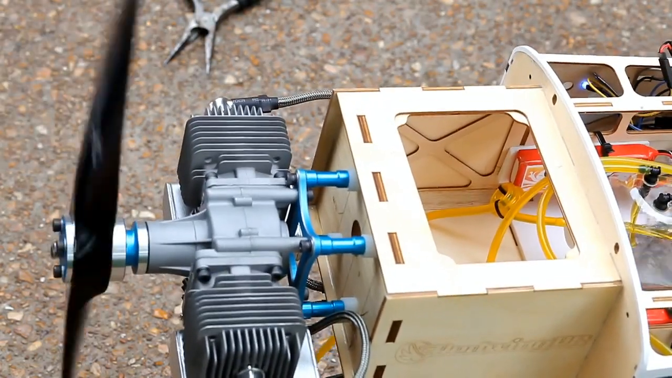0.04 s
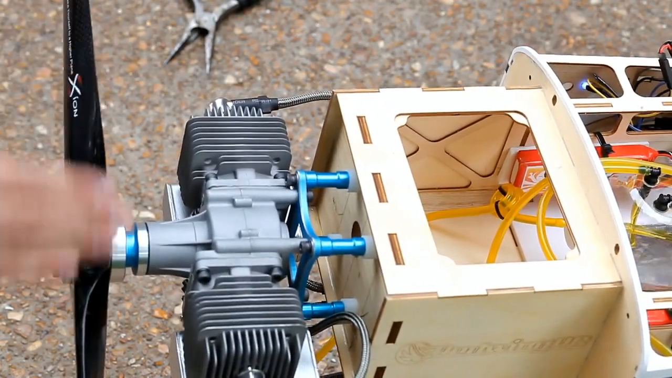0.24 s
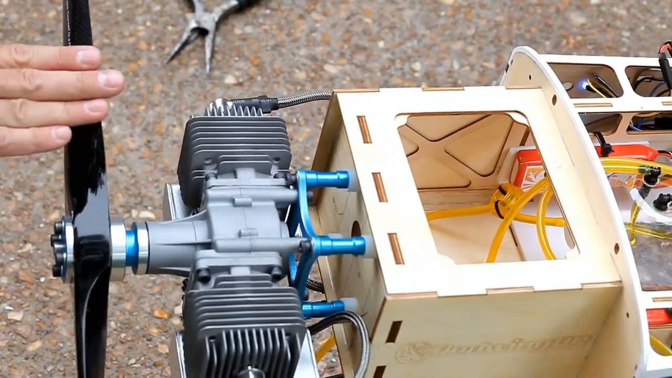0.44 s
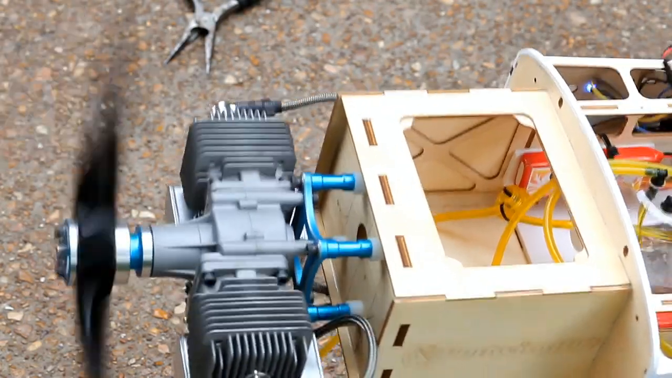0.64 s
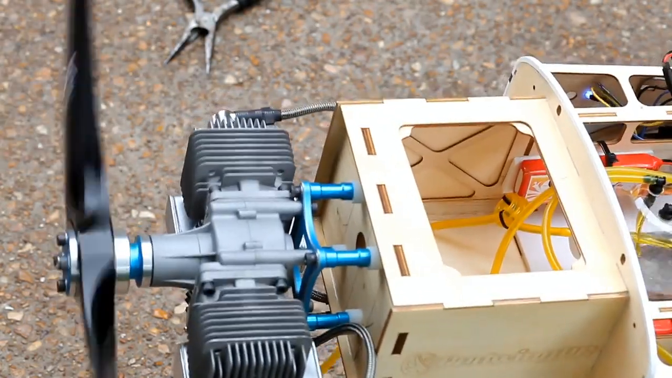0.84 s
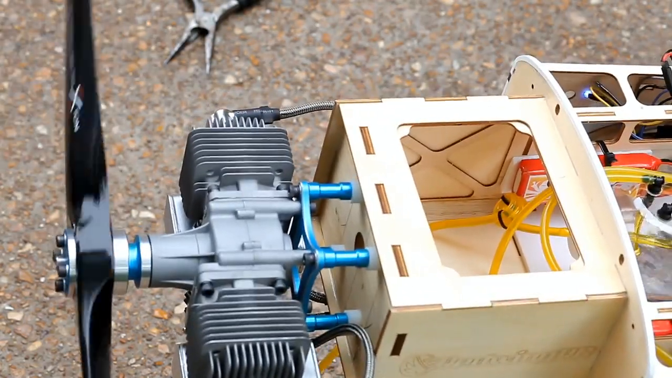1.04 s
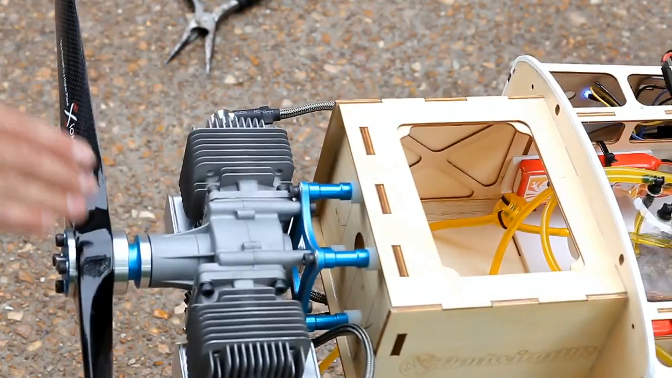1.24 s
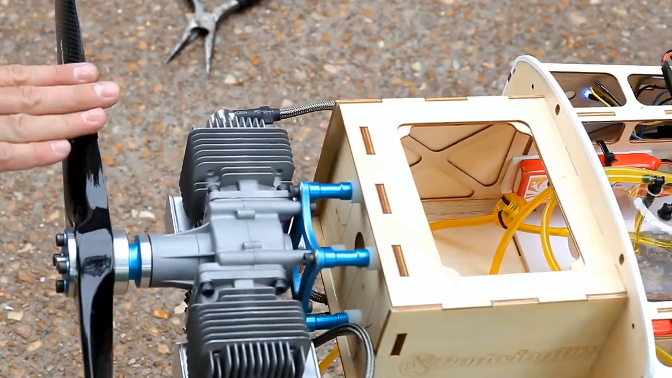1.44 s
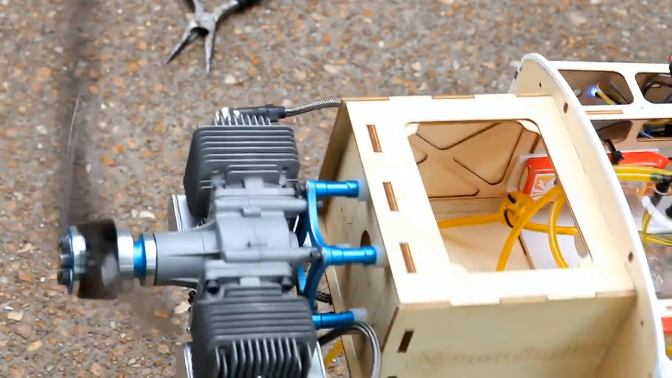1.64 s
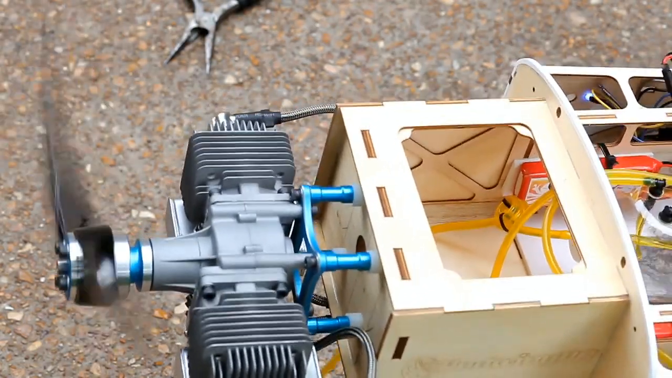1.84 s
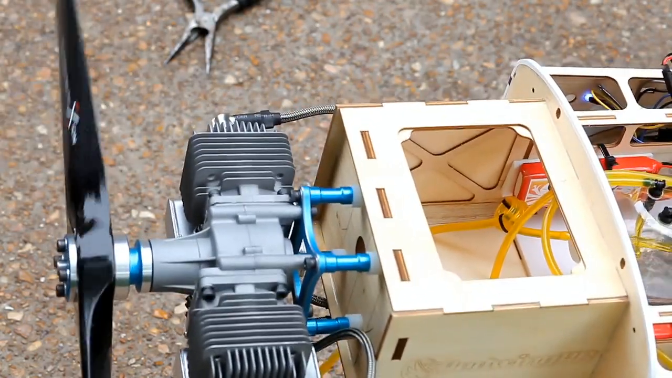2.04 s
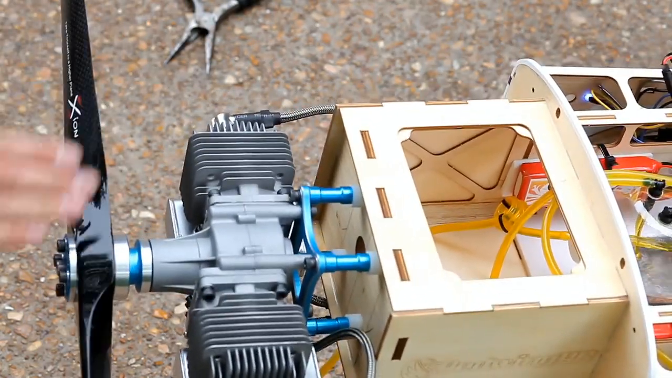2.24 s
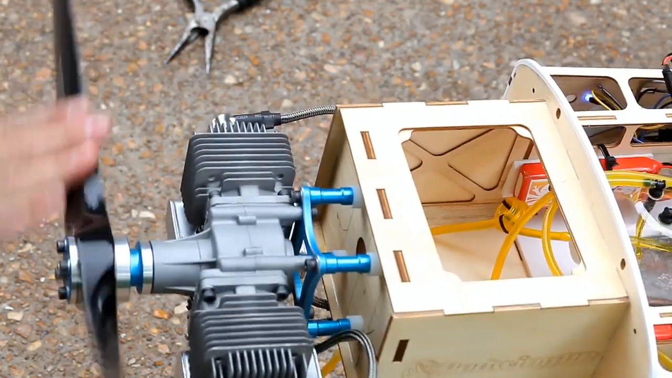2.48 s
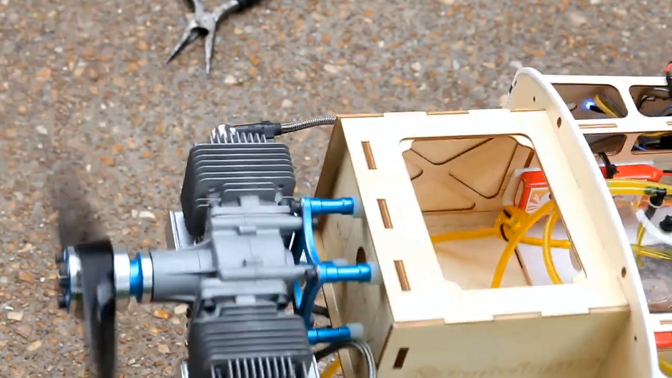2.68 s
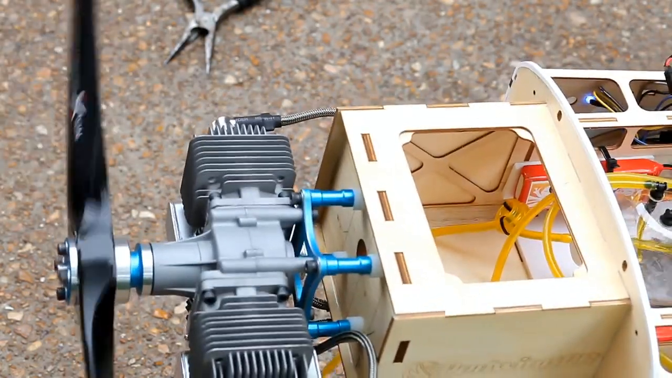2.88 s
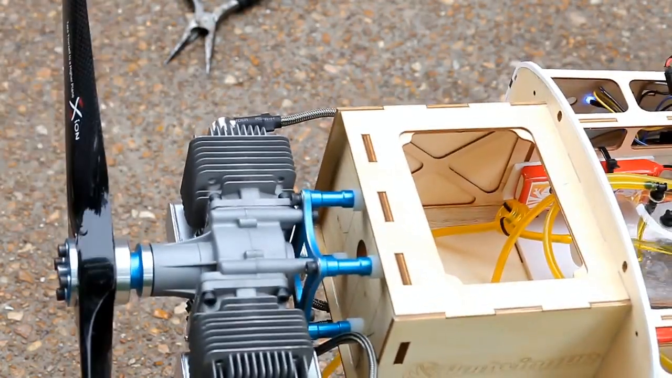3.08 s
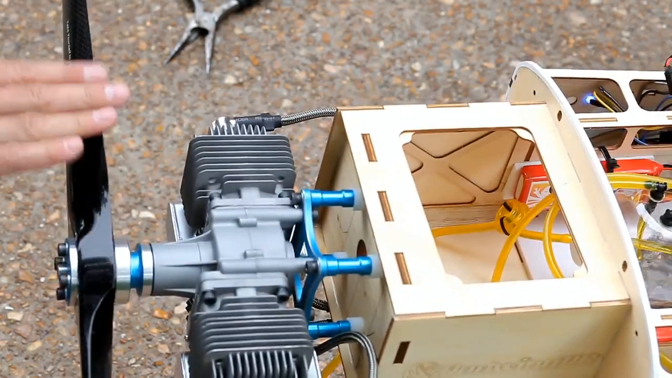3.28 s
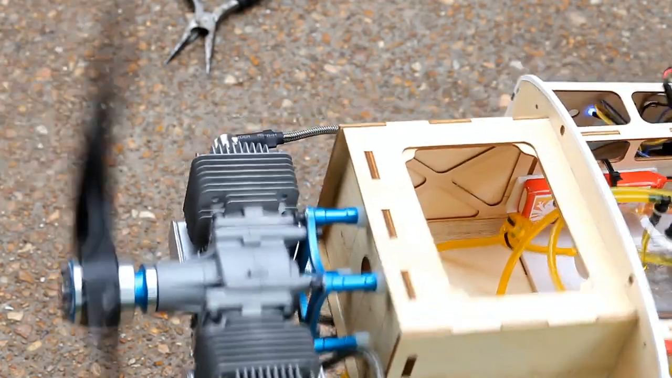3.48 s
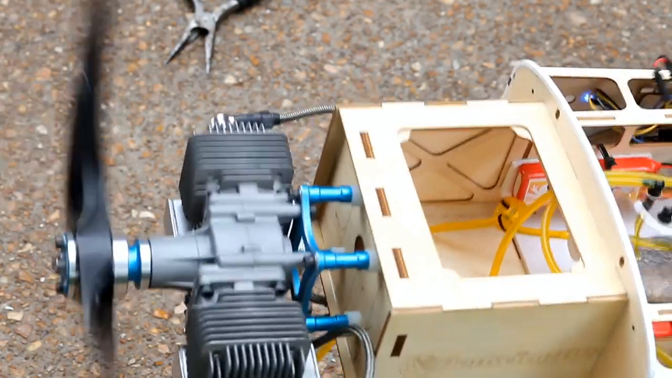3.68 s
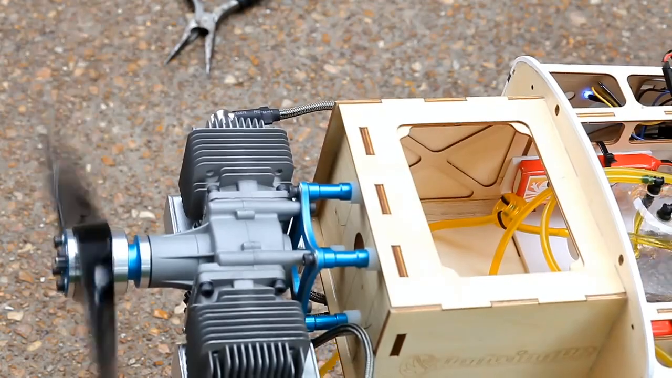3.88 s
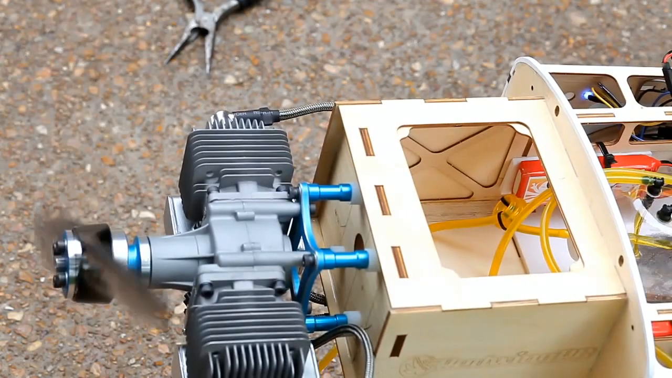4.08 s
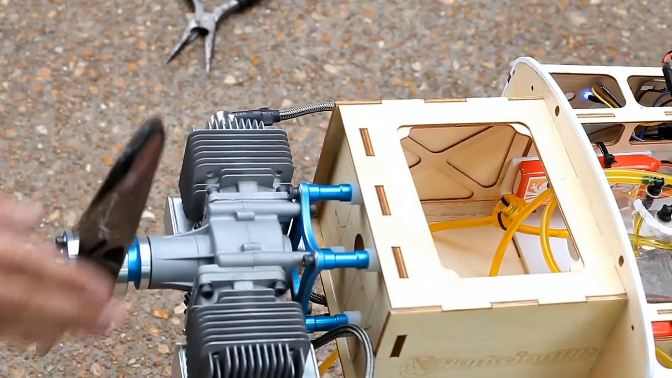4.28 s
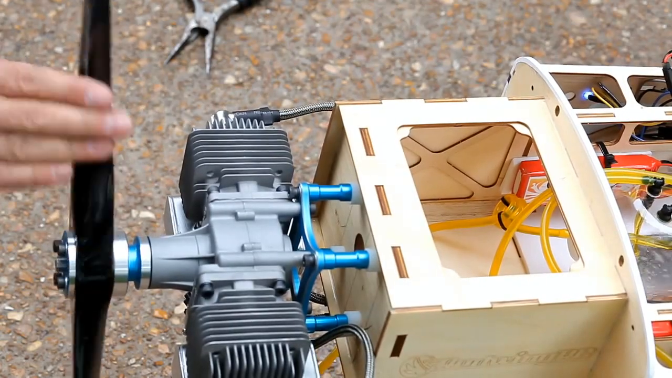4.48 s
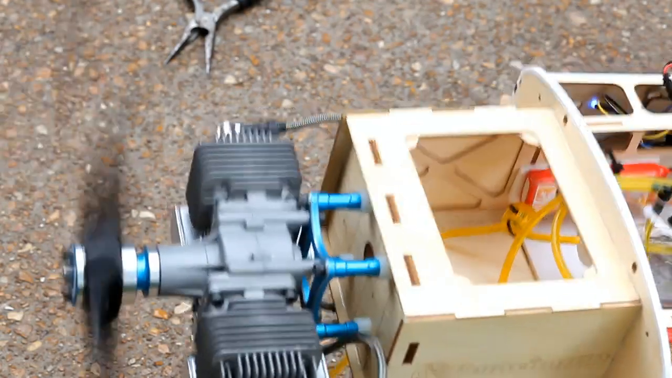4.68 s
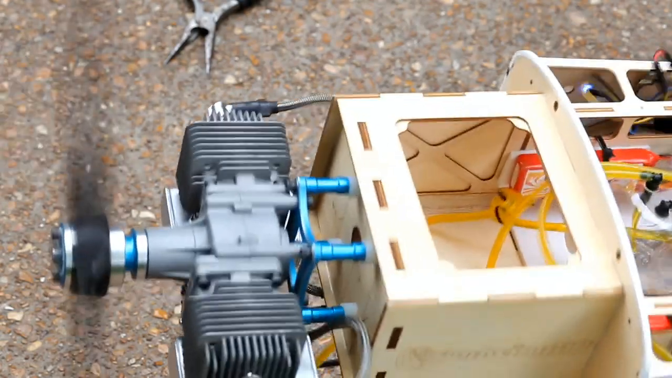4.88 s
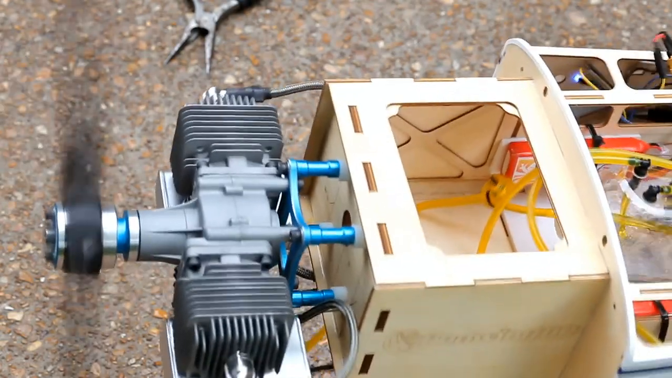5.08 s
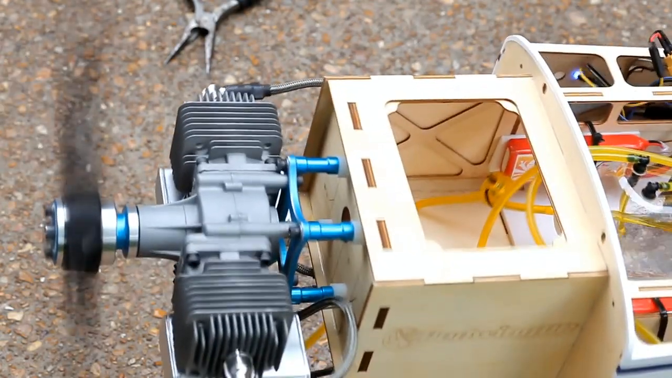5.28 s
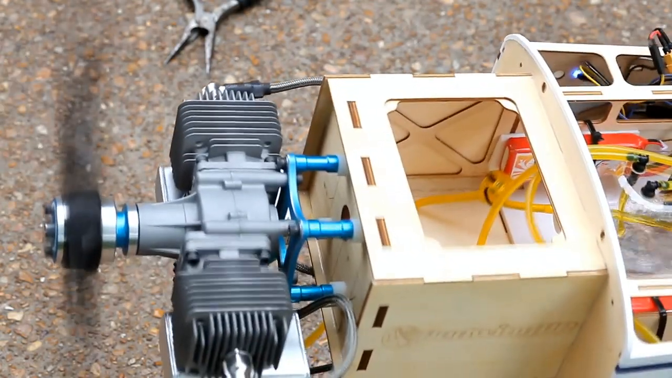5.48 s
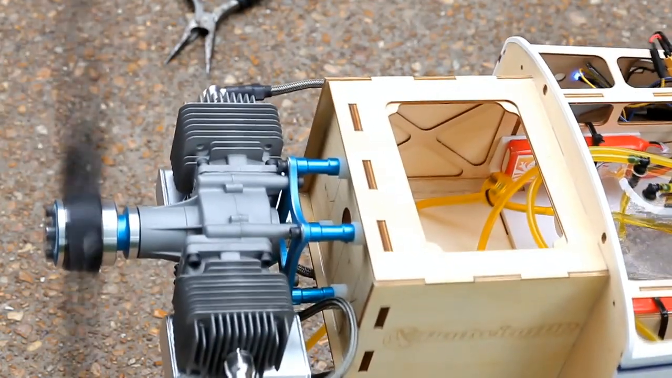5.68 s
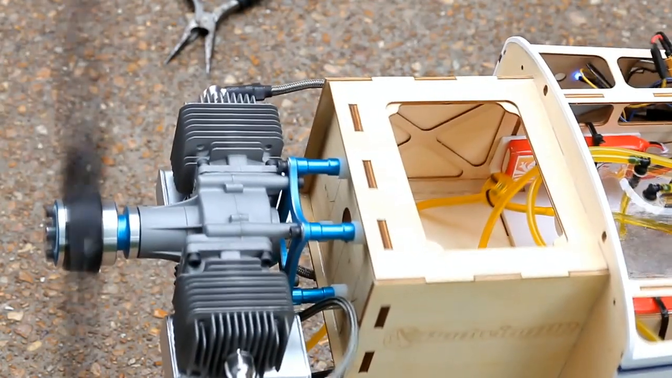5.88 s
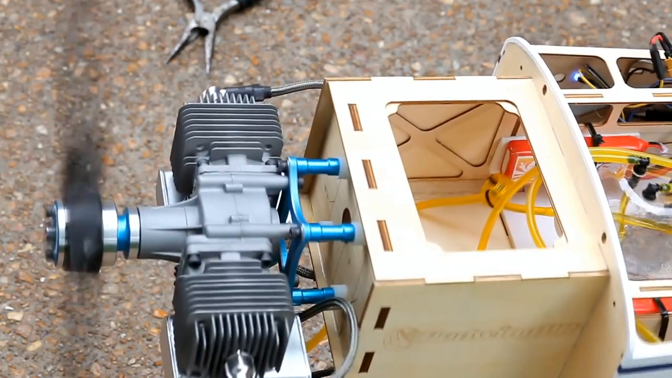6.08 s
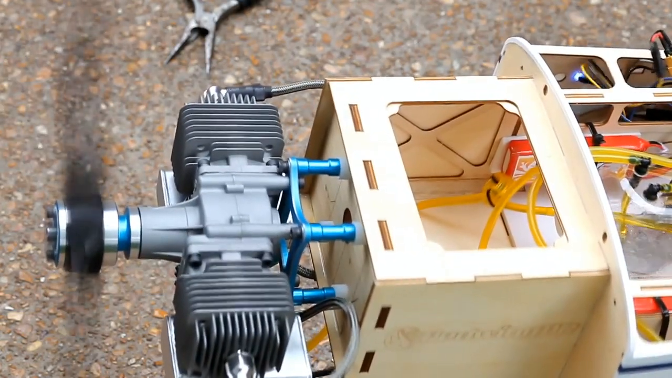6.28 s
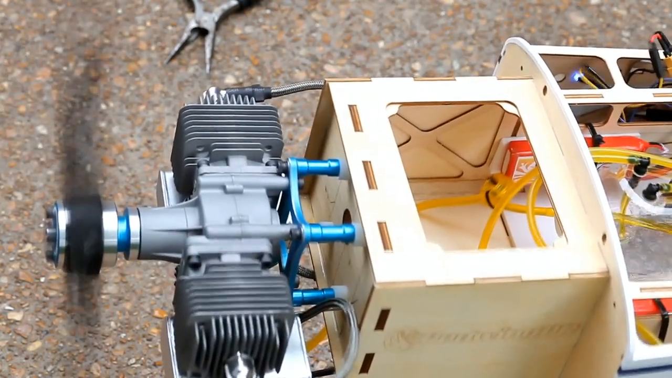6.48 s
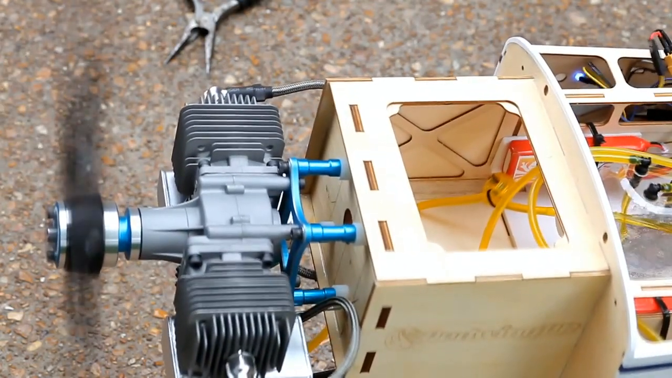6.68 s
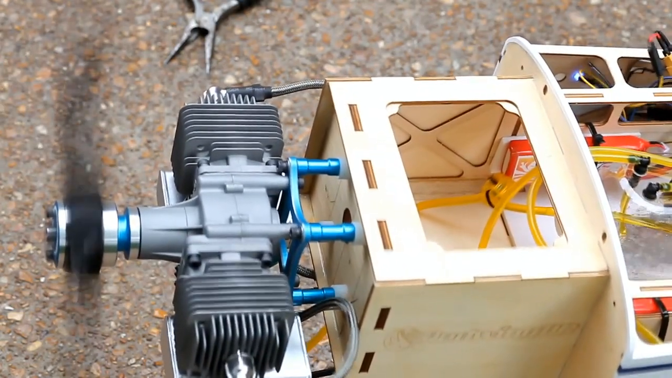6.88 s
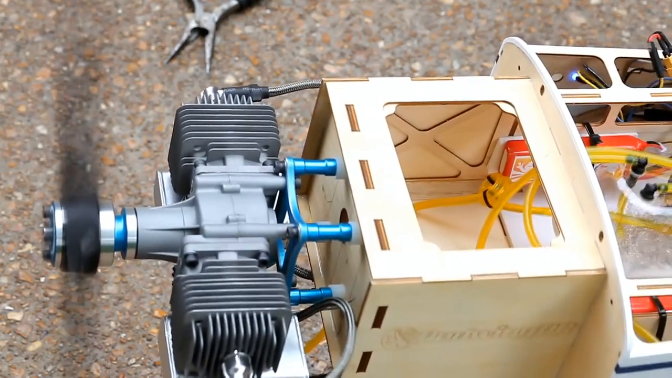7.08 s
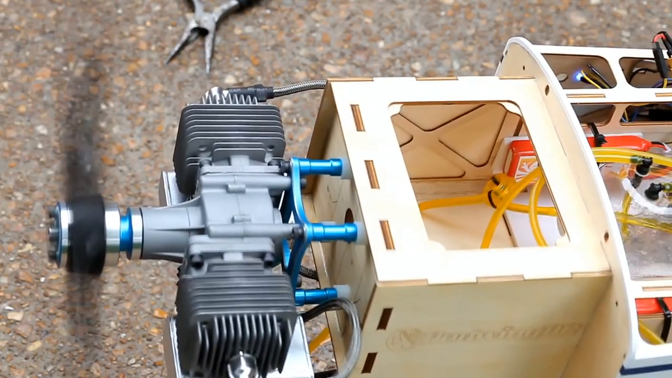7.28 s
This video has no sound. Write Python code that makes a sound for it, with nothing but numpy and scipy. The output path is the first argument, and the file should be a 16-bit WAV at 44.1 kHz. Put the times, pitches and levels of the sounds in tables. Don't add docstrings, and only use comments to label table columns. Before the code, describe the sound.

Close outdoor phone pickup of a small two-cylinder two-stroke model engine. Four hand flips of the propeller give hollow low pops with air gulps, reed clacks, hissing leaks and small knocks, with quiet gaps between. The fifth flip catches: loud, harsh, rapid exhaust cracks at an uneven idle, metallic rattle and throbbing propeller air. A short rev comes near the end, then it drops back. The loud part overloads the microphone.

```python
import sys
import numpy as np
from scipy import signal
from scipy.fft import rfft, irfft
from scipy.io import wavfile
from scipy.ndimage import uniform_filter1d

SR = 44100
rng = np.random.default_rng(int(sys.argv[2]) if len(sys.argv) > 2 else 0)


def volts_from_decibels(level):
    exponent = np.asarray(level, float) / 20
    return 10 ** exponent


def digitize_waveform(pressure):
    field = np.atleast_2d(pressure).T
    bounded = np.clip(field, -1, 1)
    quanta = np.round(bounded * 32767).astype(np.int16)
    wavfile.write(sys.argv[1], SR, quanta)


N = 323253
TIME = np.arange(N) / SR
SHORT = 8192


def level(x, db):
    return x * volts_from_decibels(db) / np.sqrt(np.mean(x ** 2))


def band(x, hz, width):
    return signal.lfilter(*signal.iirpeak(hz, hz / width, fs=SR), x)


def highpass(x, hz, order=3):
    return signal.sosfilt(signal.butter(order, hz, "high", fs=SR, output="sos"), x)


def resonate(x, peaks):
    total = 0
    for k, (hz, width, db) in enumerate(peaks):
        total = total + (-1) ** k * volts_from_decibels(db) * band(band(x, hz, width), hz, 2 * width)
    return total


def decay(t, t60):
    return 1000. ** (-t / t60)


def ring(modes, drop=0.):
    t = TIME[:SHORT]
    bent = t + drop * 0.0043 * (1 - np.exp(-t / 0.0021))
    return sum(volts_from_decibels(db) * np.sin(2 * np.pi * hz * bent) * decay(t, t60) for hz, db, t60 in modes)


def push(ms):
    shape = np.hanning(int(ms * SR / 1000) + 3)
    return shape / shape.sum()


def train(times, sizes, shape):
    clicks = np.zeros(N)
    np.add.at(clicks, np.minimum((times * SR).astype(int), N - 1), sizes)
    return signal.fftconvolve(clicks, shape)[:N]


def coloured(points):
    hz, db = np.transpose(points)
    gain = volts_from_decibels(np.interp(np.log(np.fft.rfftfreq(N, 1 / SR) + 1), np.log(hz), db))
    return level(irfft(rfft(rng.standard_normal(N)) * gain, N), 0)


def walk(rate):
    k = int(SR / rate)
    held = np.repeat(np.minimum(rng.standard_normal(N // k + 1), 1.3), k)
    return uniform_filter1d(held, k)[:N]


def grains(rate, spread_db):
    size = volts_from_decibels(spread_db * np.minimum(rng.exponential(size=N), 1.6)) * np.sign(rng.standard_normal(N))
    return (rng.random(N) < rate / SR) * size


def strokes(times, db, swell, fade):
    grid = TIME[::32]
    late = grid - np.asarray(times)[:, None]
    after = np.maximum(late, 0)
    rise = volts_from_decibels(np.asarray(db)[:, None] + swell * np.minimum(late, 0))
    fall = volts_from_decibels(-fade * after) + volts_from_decibels(-28 - 0.38 * fade * after)
    return np.interp(TIME, grid, (rise * fall).sum(axis=0))


def bursts(events, decay_s, share, db_up):
    out = np.zeros(N)
    for t, db, hz in events:
        hiss = rng.standard_normal(SHORT) * np.exp(-TIME[:SHORT] / decay_s)
        hiss = band(band(hiss, hz, share * hz), hz, 2 * share * hz)
        out[int(t * SR):int(t * SR) + SHORT] += volts_from_decibels(db + db_up) * hiss / abs(hiss).max()
    return out


# (time [s], count [turns])
CRANK_TURNS = [(4.7556, -1), (4.7951, 0), (4.8569, 2), (4.9133, 4), (4.9662, 6), (5.2755, 18), (5.4765, 26),
               (5.6701, 34), (6.0472, 50), (6.6204, 74), (6.8534, 84), (6.8973, 86), (6.9556, 89),
               (7.0908, 97), (7.1268, 99), (7.1856, 102), (7.2794, 106), (7.334, 108)]
# (time [s], burn [0-1], crack level [dB])
UNEVEN_TURNS = [(4.756, 0.81, -5), (4.828, 0.22, 3), (4.886, 0.52, 5), (4.941, 0.61, -1.5),
                (5.044, 0.57, 2), (5.199, 0.79, 3.5), (5.352, 0.37, -0.5), (5.550, 0.44, 0),
                (5.742, 0.37, -4), (5.789, 0.52, -3), (6.024, 0.7, 1), (6.167, 0.73, 1), (6.310, 0.68, -20),
                (6.453, 0.4, -16), (6.549, 0.57, -1), (6.691, 0.57, 2), (6.784, 0.72, 4.5),
                (6.830, 0.3, -7), (6.876, 0.91, -4), (6.936, 0.76, 3), (7.024, 0.99, 5),
                (7.075, 0.56, -3.5), (7.091, 0.98, -2), (7.110, 0.26, -16), (7.127, 1, -2),
                (7.147, 0.07, -25), (7.186, 0.93, -7), (7.232, 0.25, -30), (7.279, 0.83, -2)]


def firing():
    s, count = np.transpose(CRANK_TURNS)
    turns = np.arange(count[0], count[-1])
    when = np.interp(turns, count, s)
    burn = 1. * (turns % 2 == 0)
    crack_db = np.where(burn, -.1, -30.)
    blip, shut = (turns >= 86) & (turns <= 97), turns > 97
    burn[blip], crack_db[blip] = 0.81, 1.5
    for t, share, db in UNEVEN_TURNS:
        k = np.argmin(abs(when - t))
        burn[k], crack_db[k] = share, db
    return when, burn, crack_db, blip, shut


# (pitch [Hz], level [dB], t60 [s])
HOT_PIPE_TONES = [(333, -17.5, 0.037), (526.8, -3.5, 0.042), (598.5, 3, 0.018), (761, -4, 0.021),
                  (890, -21.5, 0.062), (1700, -12, 0.0078), (2243, -5, 0.0078)]
# (pitch [Hz], level [dB], t60 [s])
COLD_PIPE_TONES = [(286, 2.5, 0.022), (508, -6, 0.027), (612, 11, 0.033)]


def exhaust():
    when, burn, _, blip, shut = firing()
    force_luck, late_luck, cough_luck, twin_luck, twin_size_luck = rng.standard_normal((5, len(when)))
    force = -burn * volts_from_decibels(1.37 * force_luck + 1.5 * blip)
    opens = when + 0.0023 * (1 - burn)
    bang, heat = 0, rng.integers(-1, 2, len(when))
    for step in (-1, 0, 1):
        pipe = ring(np.multiply(HOT_PIPE_TONES, (1 + step * 0.043, 1, 1)), drop=0.17)
        blow = np.convolve(pipe, push(ms=0.91))
        size = force * (heat == step)
        bang += train(opens, size, blow)
        bang += train(opens + .0017 + .00012 * twin_luck, size * volts_from_decibels(-9 + 1.6 * twin_size_luck), blow)
    cough_size = (burn - 1) * volts_from_decibels(1.5 * cough_luck - 3.5 * shut)
    cough = train(when + 0.00051 * late_luck, cough_size, np.convolve(ring(COLD_PIPE_TONES), push(ms=2.0)))
    rough = 1 + 0.12 * level(band(rng.standard_normal(N), 1600, 1300), 0)
    return highpass(volts_from_decibels(.3) * bang * rough + volts_from_decibels(-3.7) * cough, 294)


# (pitch [Hz], width [Hz], level [dB], change while cold [dB])
METAL_PARTS = [(1030, 120, -11, 0), (1410, 500, -8, 0), (1580, 130, -7, 0), (2260, 160, -9.5, 0),
               (3460, 110, -5.5, -6), (3780, 260, -8, -3), (4400, 1450, -4.5, 0), (4780, 200, -14, 2),
               (7330, 350, -8, -6), (7980, 480, -7.5, -5), (9800, 1400, -7, 4)]


def metal():
    when, burn, crack_db, _, _ = firing()
    t = TIME[:SHORT]
    hiss = (1 - np.exp(-t / .0006)) * np.exp(-t / 0.0042) + 0.22 * np.exp(-t / 0.011)
    size = volts_from_decibels(crack_db + 1.5 * rng.standard_normal(len(when)))
    jet = train(when + 0.0022 - 0.0012 * (1 - burn), size, hiss)
    jet = jet * rng.standard_normal(N) * volts_from_decibels(4.0 * walk(700))
    rattle = signal.lfilter([1], [1, -.97], abs(grains(rate=160, spread_db=6)))
    jet += volts_from_decibels(-17) * (TIME > when[0]) * rattle * rng.standard_normal(N)
    cold = np.interp(TIME, (4.8, 5.5), (1, 0))
    mix = rng.standard_normal((len(when), len(METAL_PARTS)))
    mix = mix[np.clip(np.searchsorted(when, TIME) - 1, 0, None)].T
    out = 0
    for (hz, width, db, cold_db), m in zip(METAL_PARTS, mix):
        struck = volts_from_decibels(db + cold_db * cold + 4.5 * np.minimum(m, .9)) * jet
        out = out + band(struck, hz, width) / np.sqrt(width / 500)
    return volts_from_decibels(-5.5) * out


# (time [s], level [dB])
LOAD = [
    (4.7, -45),
    (4.8, -22),
    (5.2, -21.5),
    (6.8, -20.5),
    (6.95, -17),
    (7.05, -15.5),
    (7.13, -18.5),
    (7.22, -23.5),
    (7.33, -24.5),
]
# (multiple of shaft speed, level [dB])
SHAFT_TONES = [(1, -10), (2, -11), (3, -4), (4, -12), (5, -4), (6, -5), (7, -51)]
# (frequency [Hz], level [dB per Hz])
WASH_NOISE = [(20, -22), (45, -32), (150, -4), (300, -7.5), (600, -1.5), (1000, -8.5), (1700, -12.5),
              (2900, -22), (4000, -18.5), (6300, -31), (8000, -26), (11000, -30)]


def propeller():
    s, load_db = np.transpose(LOAD)
    angle = 2 * np.pi * uniform_filter1d(np.interp(TIME, *np.transpose(CRANK_TURNS)), size=2001)
    speed = np.gradient(angle) * SR / (2 * np.pi)
    tones, thump = 0, angle - 2 * np.pi * speed * 0.00471
    for k, db in SHAFT_TONES:
        hz = k * speed
        box_db = 7.5 / (1 + ((hz - 180) / 55) ** 2)
        dull_db = 10 * np.log10(1 + (hz / 270) ** 8)
        size = volts_from_decibels(db + box_db - dull_db + 1.6 * walk(17))
        tones = tones - size * np.cos(k * thump + 0.34 * walk(25))
    tones = tones * (1 - 0.095 * np.cos(thump / 2))
    throb = 1 + 0.034 * np.sin(2 * angle) + 0.24 * np.cos(angle - 1.3)
    wash = coloured(WASH_NOISE) * throb * volts_from_decibels(2.0 * walk(70))
    load_db = np.interp(TIME, s, load_db, left=-120)
    return volts_from_decibels(load_db) * (wash + volts_from_decibels(0.5 + 0.48 * np.maximum(load_db + 22, 0)) * tones)


# (time [s], peak level [dB], pipe pitch [Hz], brightness [dB])
COLD_POPS = [(0.608, -13.5, 158.5, -9), (0.705, -19.5, 187, -22), (0.846, -29, 181.4, -28),
             (1.115, -50, 180, -20), (1.486, -42, 200, -20), (1.588, -11.5, 174, -2),
             (1.677, -17, 184, -14), (1.812, -29, 137, -11), (2.16, -47, 171, -20),
             (2.195, -45.5, 190, -20), (2.539, -10, 185.4, 0.5), (2.621, -17, 200, -8),
             (2.749, -25.5, 156, -12), (2.88, -40, 146, -12), (2.912, -38, 151, -12),
             (2.945, -39, 145, -12), (3.476, -11, 193, 0), (3.541, -10.5, 248, 2), (3.596, -11.5, 178, -3),
             (3.679, -18, 128, -0.5), (3.788, -21.5, 171, -19), (3.961, -35, 180, -19),
             (4.658, -11, 247, 1.5), (4.714, -13, 270, 9)]


def pops():
    out, t, wall_s = np.zeros(N), TIME[:SHORT], .027
    upper = np.convolve(ring([(560, 2.0, 0.021), (700, -10, 0.025)]), push(ms=0.79))[:SHORT]
    thin = np.convolve(ring([(320, 0, .055), (1.22 * 320, -5, .04)]), push(ms=1.5))[:SHORT]
    for start, db, hz, bright_db in COLD_POPS:
        rise = .0045 + .0009 * max(-10.5 - db, 0)
        late = np.maximum(t - rise, 0)
        swell = np.minimum(t / rise, 1) ** .45
        tone = np.sin(2 * np.pi * hz * t) * (decay(late, .034) + volts_from_decibels(-19) * decay(late, .3))
        overtone = volts_from_decibels(-11) * np.sin(2 * np.pi * 1.48 * hz * t) * decay(late, .03)
        heave = volts_from_decibels(-6) * np.sin(2 * np.pi * .5 * hz * t) * decay(t, .055)
        thud = swell * (tone + overtone) + heave
        pop = volts_from_decibels(db + 3.3) * thud / abs(thud).max() - volts_from_decibels(db + bright_db - 1.5) * upper
        out[int(start * SR):int(start * SR) + SHORT] += pop
        echo = int((start + wall_s) * SR)
        out[echo:echo + SHORT] += volts_from_decibels(db - 4.5 + .5 * min(bright_db, 0)) * thin
    back = np.roll(out, int(wall_s * SR))
    return highpass(out + volts_from_decibels(-12.5) * band(back, 185, 130), 44)


def plywood_box():
    popped, pop_db = np.transpose(COLD_POPS)[:2]
    swelling = strokes(popped + 0.0074, pop_db - 15.5, swell=4000, fade=190)
    boom = resonate(rng.standard_normal(N), [(180, 71, -0.5), (353, 183, -13)])
    return swelling * level(boom, -2.5)


# (time [s], gulp level [dB], reeds level [dB], leak level [dB])
HAND_STROKES = [(.55, -53, -51, -68), (.6, -28, -33.5, -36), (.645, -30, -35, -43),
                (0.685, -27.5, -36.5, -44.5), (.74, -36, -46, -56), (.785, -46, -52, -56),
                (.834, -44, -46, -53), (1.104, -49, -60, -65), (1.582, -33, -37, -41),
                (1.596, -36, -36, -39), (1.632, -34, -39, -38), (1.67, -22, -31, -35),
                (1.735, -36, -44, -52), (1.8, -46, -48, -55), (2.02, -51, -62, -74), (2.462, -51, -47, -54),
                (2.542, -21.5, -30, -33), (2.612, -31, -32.5, -34.5), (2.642, -25, -45, -42),
                (2.704, -44, -44, -57), (2.885, -51, -54, -71), (2.94, -46, -56, -72),
                (3.02, -49, -62, -75), (3.435, -45, -48, -67), (3.479, -27, -32.5, -29),
                (3.532, -28, -21, -23.5), (3.575, -30, -24, -28), (3.594, -22, -26, -32),
                (3.62, -27, -36, -44), (3.65, -31, -36, -47), (3.69, -40, -43, -47), (3.755, -50, -51, -57),
                (3.802, -56, -49, -56), (3.954, -50, -55, -56), (4.6, -47, -47, -63), (4.65, -30, -36, -45),
                (4.663, -23, -25.5, -30), (4.715, -21, -25.5, -24.5), (4.738, -26, -30, -27),
                (4.76, -19, -27, -27)]
# (pitch [Hz], width [Hz], level [dB])
INTAKE_TONES = [(486, 930, 1), (700, 313, 30), (1080, 620, -35)]
# (pitch [Hz], width [Hz], level [dB])
REED_TONES = [(1350, 370, -1), (1630, 270, 7.5), (2180, 400, -4.5), (2780, 1100, -7.5)]


def wheeze():
    s, gulp_db, reeds_db, leak_db = np.transpose(HAND_STROKES)
    air = strokes(s, gulp_db, swell=600, fade=225)
    reeds = strokes(s, reeds_db, swell=2500, fade=235)
    leaks = strokes(s, leak_db, swell=3000, fade=270)
    chatter = level(grains(rate=450, spread_db=4.5), 0.76)
    gulp = resonate(rng.standard_normal(N) * volts_from_decibels(6.9 * walk(110)) + chatter, INTAKE_TONES)
    clatter = resonate(rng.standard_normal(N) * volts_from_decibels(6.2 * walk(120)) + chatter, REED_TONES)
    leak = rng.standard_normal(N) * volts_from_decibels(6.5 * walk(130)) + level(grains(rate=640, spread_db=10.0), -6.5)
    hiss = band(highpass(leak, 3000, order=2), 6500, 11000)
    out = volts_from_decibels(-1.2) * air * level(gulp, -3.03)
    out += volts_from_decibels(-1.5) * reeds * level(clatter, -1.8)
    return out + volts_from_decibels(.3) * leaks * level(hiss, -3.2)


# (time [s], peak level [dB], pitch [Hz])
LEAK_SPITS = [(0.5851, -36, 4460), (0.6005, -29, 4540), (0.6134, -31, 3370), (0.626, -27, 5350),
              (0.6519, -24, 5500), (0.6664, -34, 5050), (0.6908, -31, 6300), (0.7133, -39, 4200),
              (0.7387, -43, 3040), (0.7814, -45, 3450), (0.8305, -39, 3870), (0.9298, -46, 3890),
              (1.0994, -44, 3040), (1.5778, -36, 3480), (1.5863, -32, 4040), (1.5934, -31, 3350),
              (1.6214, -33, 4190), (1.6352, -31, 5490), (1.6646, -24, 5750), (1.6714, -26, 5800),
              (1.6796, -23, 5660), (1.6954, -34, 5530), (1.7044, -36, 3920), (1.737, -38, 4080),
              (1.7983, -37, 3070), (2.4543, -42, 4650), (2.5396, -23, 7530), (2.5464, -26, 3040),
              (2.6055, -27, 6720), (2.6125, -21, 5710), (2.6309, -21, 6190), (2.6354, -22, 5570),
              (2.6554, -35, 3410), (2.6873, -38, 3130), (2.6974, -37, 5050), (2.7252, -43, 5610),
              (3.479, -20, 3120), (3.5299, -11, 4470), (3.5434, -17, 6360), (3.5654, -20, 5560),
              (3.5743, -15, 5640), (3.5894, -22, 5500), (3.6004, -19, 5180), (3.6144, -26, 5640),
              (3.6274, -32, 6090), (3.6516, -31, 5500), (3.6674, -31, 4540), (3.7045, -32, 7860),
              (3.7803, -47, 3470), (3.8422, -48, 3640), (3.9524, -43, 6070), (4.6598, -20, 3980),
              (4.7117, -16, 5630), (4.7351, -15, 5550), (4.7606, -13, 6900)]


def leak_spits():
    return bursts(LEAK_SPITS, decay_s=.0032, share=.27, db_up=-3.5)


# (time [s], peak level [dB], pitch [Hz])
REED_CLACKS = [(0.5477, -46, 1480), (0.5771, -34, 1150), (0.5934, -29, 1540), (0.627, -23, 1470),
               (0.6539, -23, 1670), (0.6779, -24, 1180), (0.6914, -23, 1650), (0.7392, -31, 1650),
               (0.8335, -34, 1680), (0.9268, -47, 1200), (1.5623, -34, 1570), (1.5763, -31, 1580),
               (1.6067, -28, 1450), (1.6347, -30, 1480), (1.6641, -23, 1700), (1.6834, -25, 1170),
               (1.7054, -28, 1180), (1.736, -29, 1700), (1.7998, -32, 1520), (1.8243, -41, 1440),
               (1.8801, -46, 1650), (2.4553, -41, 1540), (2.4862, -40, 1440), (2.5287, -29, 1460),
               (2.5384, -27, 1410), (2.6035, -24, 1520), (2.611, -21, 1390), (2.6364, -24, 1170),
               (2.6978, -29, 1560), (2.7846, -43, 1190), (2.8035, -42, 1450), (2.8404, -44, 1530),
               (2.8774, -44, 1690), (2.9347, -45, 1710), (3.454, -32, 1580), (3.475, -25, 1420),
               (3.5464, -15, 1600), (3.5798, -14, 1430), (3.5992, -14, 1150), (3.6516, -21, 1760),
               (3.7055, -33, 1650), (3.7414, -41, 1590), (3.7534, -40, 2060), (3.7833, -36, 1720),
               (3.8028, -36, 1410), (3.8312, -40, 1530), (3.8422, -39, 1630), (3.8631, -40, 1750),
               (3.8911, -44, 1440), (3.9064, -46, 1480), (3.9534, -35, 1530), (4.6603, -18, 1610),
               (4.7132, -17, 1220), (4.7366, -14, 1710)]


def reed_clacks():
    return bursts(REED_CLACKS, decay_s=.004, share=.14, db_up=-1.5)


# (time [s], peak level [dB], pitch
# [Hz], t60 [s], brightness [dB])
KNOCKS = [(0.597, -29, 800, 0.064, -19), (.679, -19, 800, .05, -20), (.692, -19, 760, .04, -20),
          (.737, -25, 700, .05, -20), (0.832, -36, 791, 0.089, -5), (0.926, -42, 767, 0.064, -10),
          (1.104, -29, 565, 0.085, -26), (1.484, -34.5, 414, 0.056, -13), (1.53, -38, 700, .07, -10),
          (1.575, -18.5, 560, 0.07, -17), (1.734, -22, 700, .04, -20), (1.775, -31, 650, .04, -20),
          (1.798, -38, 5600, .05, 0), (1.808, -39, 791, 0.061, -15), (2.022, -40, 520, 0.045, -10),
          (2.159, -49, 517, 0.07, -8), (2.223, -46, 428, 0.07, -8), (2.456, -43, 600, 0.07, 3),
          (2.599, -18, 805, 0.05, -5), (2.612, -11.5, 700, 0.05, -8), (2.628, -15, 900, .05, -10),
          (2.645, -10, 760, 0.042, -22), (2.804, -37, 784, 0.057, -14), (2.883, -44, 630, 0.064, -13),
          (2.895, -38, 320, .16, -30), (2.925, -36, 420, .14, -30), (2.95, -38, 310, .16, -30),
          (3.467, -12.5, 645, 0.067, -28), (3.529, -12, 518, 0.1, 6), (3.531, -12, 2050, .04, -10),
          (3.6, -5, 760, 0.03, -10), (3.763, -28.5, 740, 0.056, -3), (3.844, -45, 829, 0.07, 1),
          (3.784, -31, 760, .05, -20), (3.93, -40, 720, .04, -20), (3.954, -39, 800, 0.07, -4),
          (4.761, -4, 650, .04, -20), (4.78, -5, 716, 0.063, -16)]


def ticks():
    out = np.zeros(N)
    for t, db, hz, t60, bright_db in KNOCKS:
        noise = rng.standard_normal((2, SHORT))
        wood = noise[0] * decay(TIME[:SHORT], t60)
        wood = band(band(wood, hz, 0.25 * hz), hz, 0.54 * hz)
        click = noise[1] * decay(TIME[:SHORT], 0.037)
        click = band(click, 1970, 700) + volts_from_decibels(-14) * highpass(click, 2300)
        knock = wood / abs(wood).max() + volts_from_decibels(bright_db + 0.5) * click / abs(click).max()
        out[int(t * SR):int(t * SR) + SHORT] += volts_from_decibels(db - 4.5) * knock
    return out


# (frequency [Hz], level [dB per Hz])
YARD_AIR = [(15, -53), (25, -19), (66, -14), (197, -11.5), (235, -5), (260, -13), (372, -16), (651, -12),
            (740, -12), (1710, -15.5), (4990, -24.5), (9440, -25.5), (11000, -25), (14300, -65),
            (22000, -120)]
# (pitch [Hz], width [Hz], level [dB])
FAR_HUM = [(234.6, 7.1, -67), (606, 23, -70)]


def yard():
    hum = 0
    for hz, width, db in FAR_HUM:
        hum = hum + level(band(band(rng.standard_normal(N), hz, width), hz, width), db)
    breeze = level(band(rng.standard_normal(N), 40, 60), -64.5) * volts_from_decibels(6.2 * walk(3.23))
    return volts_from_decibels(-57 + 0.37 + 0.86 * walk(3.6)) * coloured(YARD_AIR) + hum + breeze


def scene():
    engine = exhaust() + metal() + propeller() + pops() + plywood_box()
    engine += wheeze() + leak_spits() + reed_clacks() + ticks()
    # (pitch [Hz], width [Hz], share)
    for hz, width, share in [(455.5, 41.5, 0.78), (3000, 470, 0.14), (6100, 560, 0.073)]:
        engine = engine - share * band(engine, hz, width)
    paving = band(np.roll(engine, int(0.004166 * SR)), 1160, 1900)
    return (engine + volts_from_decibels(-20.5) * paving + yard())[None]


def roll_off(x):
    return signal.sosfilt(signal.butter(12, 16000, fs=SR, output="sos"), x)


def record(dry):
    top = signal.ellip(10, .2, 70, 10650, fs=SR, output="sos")
    capsule = signal.sosfilt(top, dry)
    ceiling = 0.83
    flat = capsule / (1 + abs(capsule / ceiling) ** 6) ** (1 / 6)
    flat = highpass(flat, 46, order=1)
    body = signal.sosfiltfilt(top, flat)
    mix = body + volts_from_decibels(-8) * (flat - body)
    return roll_off(mix)


dry = scene()
out = record(dry)
digitize_waveform(out)
```